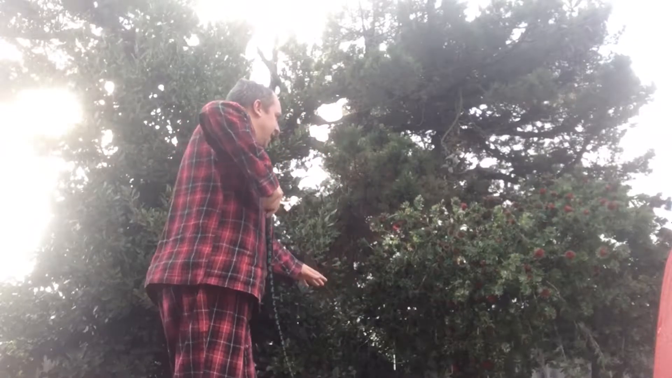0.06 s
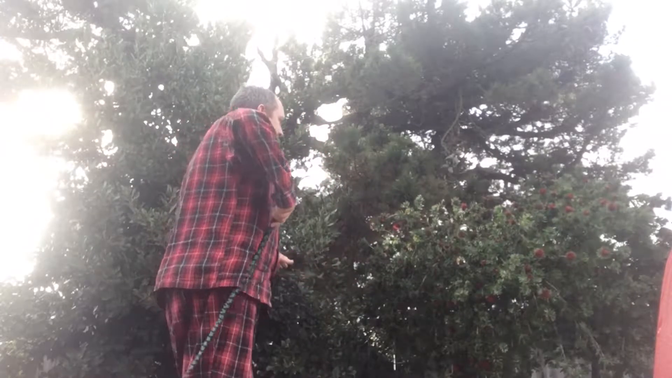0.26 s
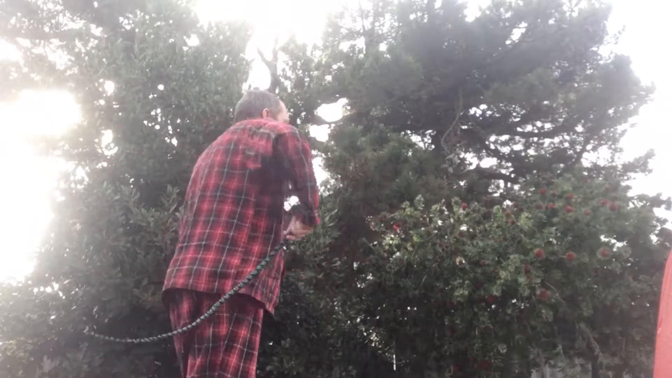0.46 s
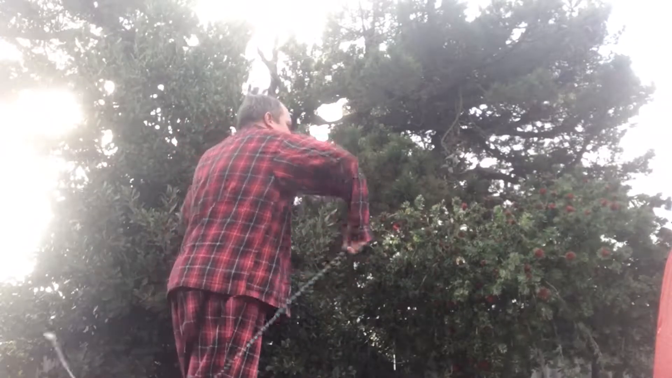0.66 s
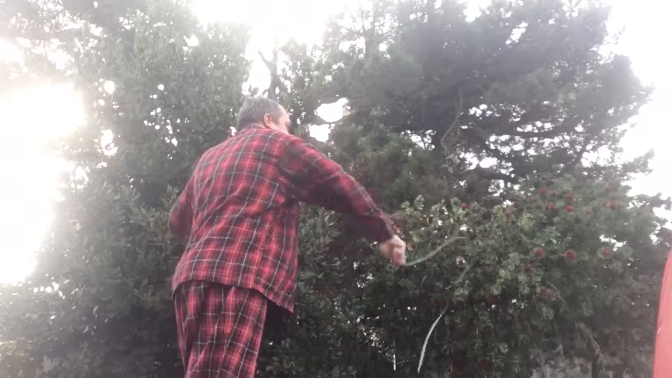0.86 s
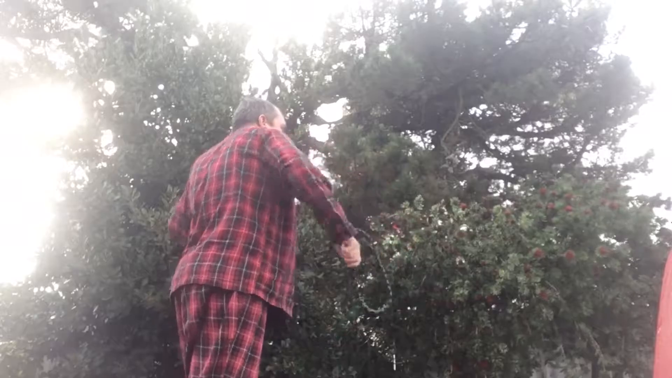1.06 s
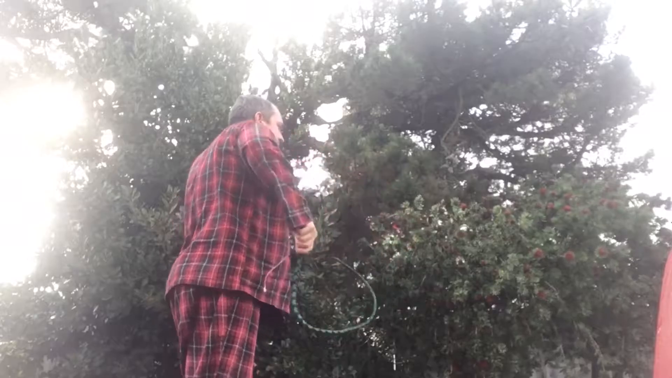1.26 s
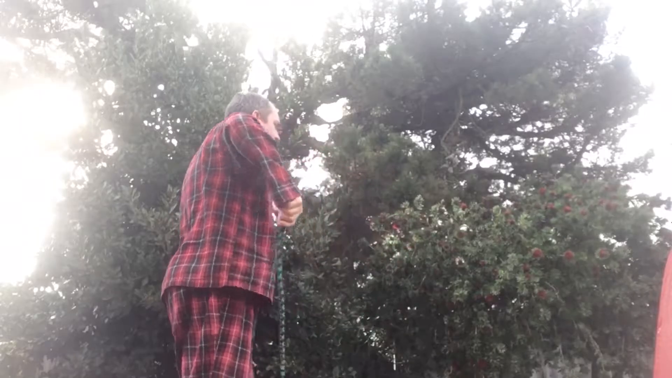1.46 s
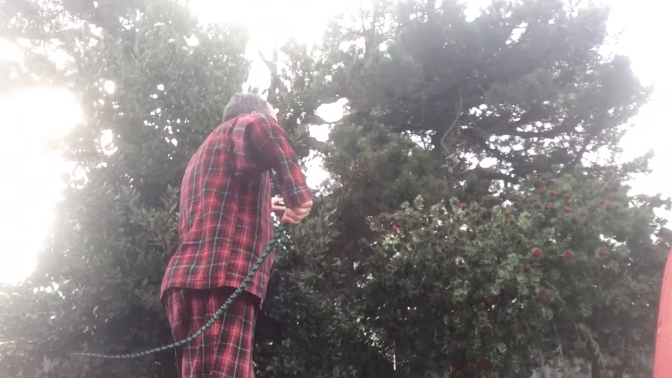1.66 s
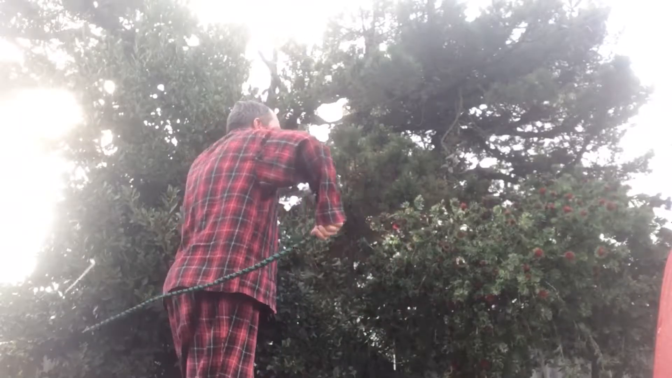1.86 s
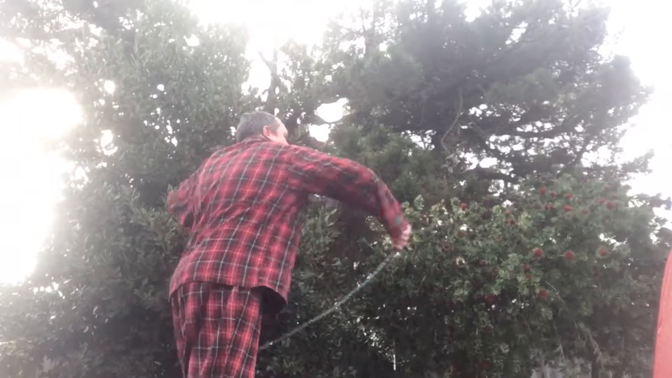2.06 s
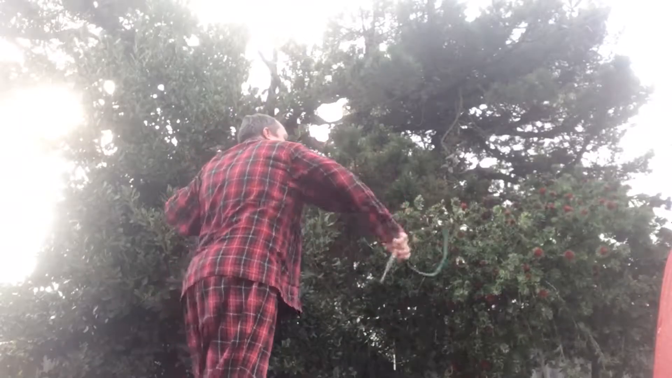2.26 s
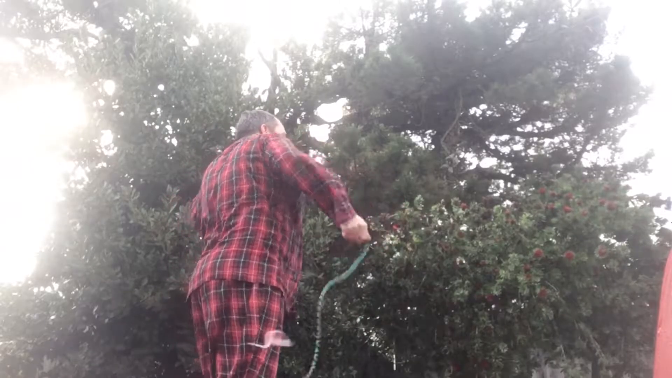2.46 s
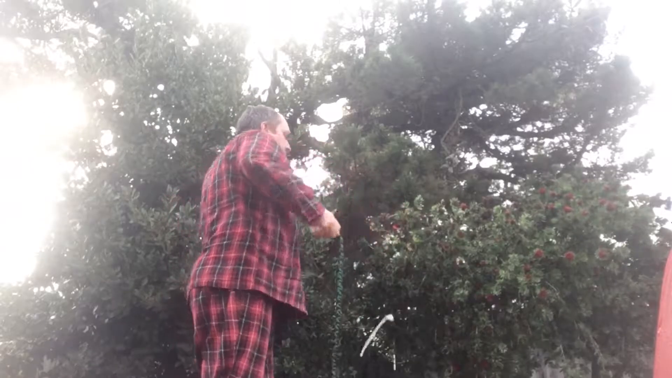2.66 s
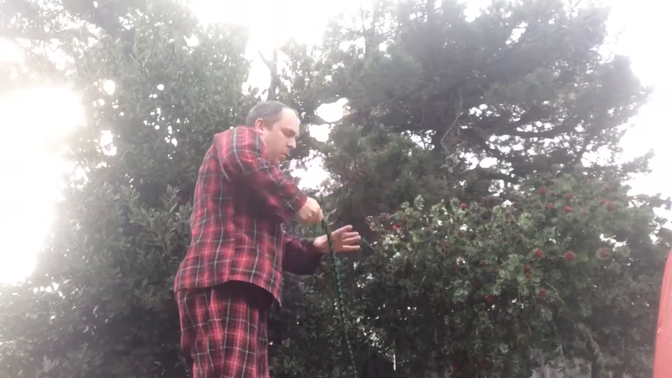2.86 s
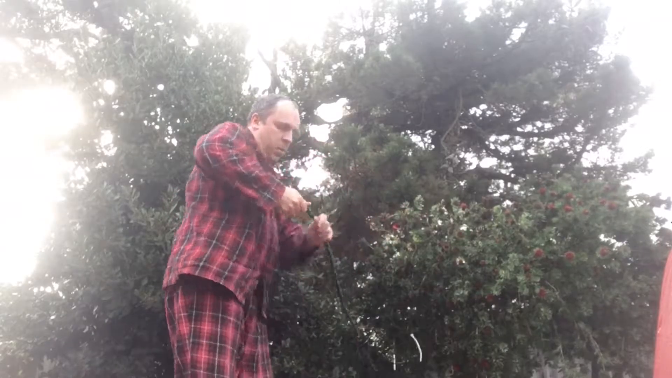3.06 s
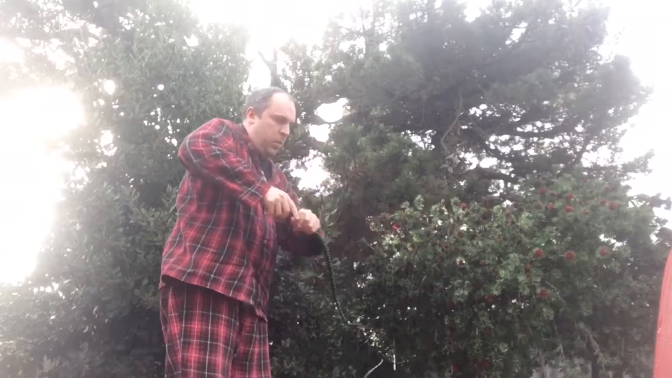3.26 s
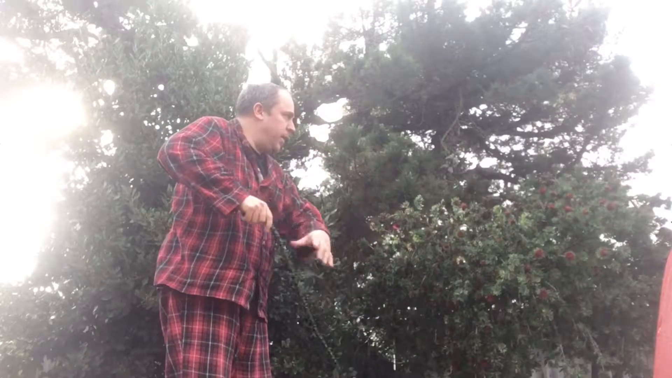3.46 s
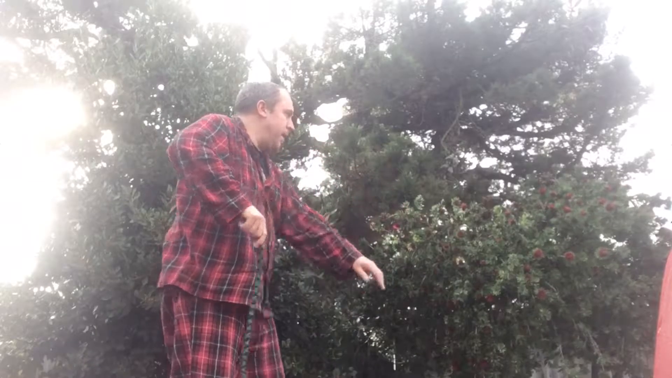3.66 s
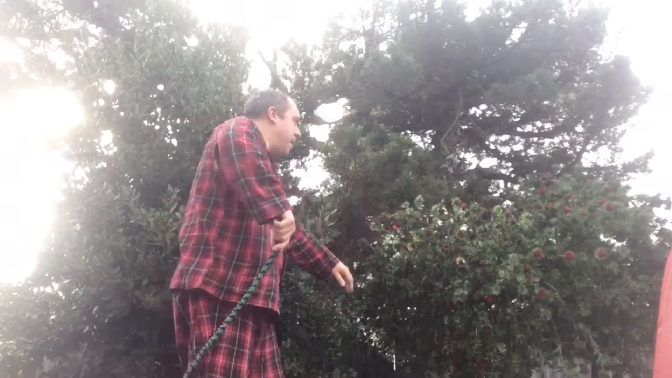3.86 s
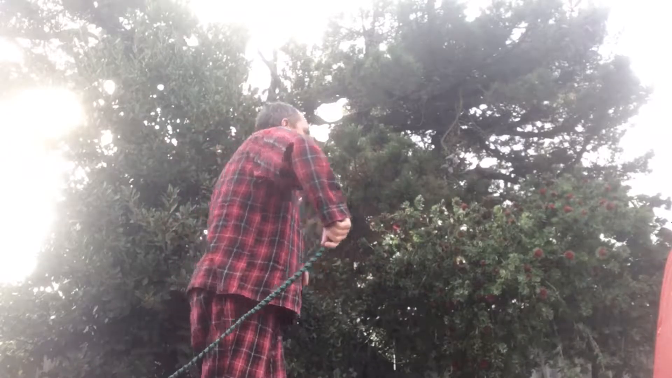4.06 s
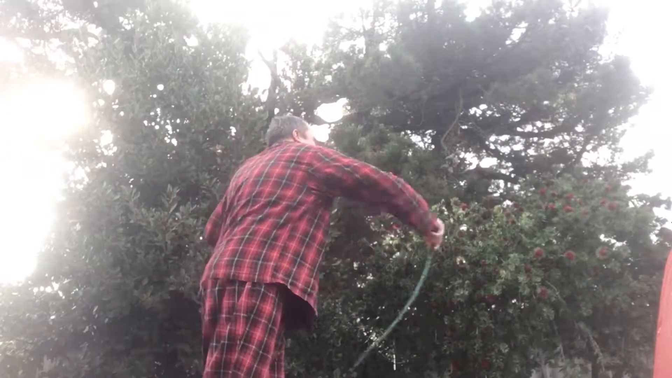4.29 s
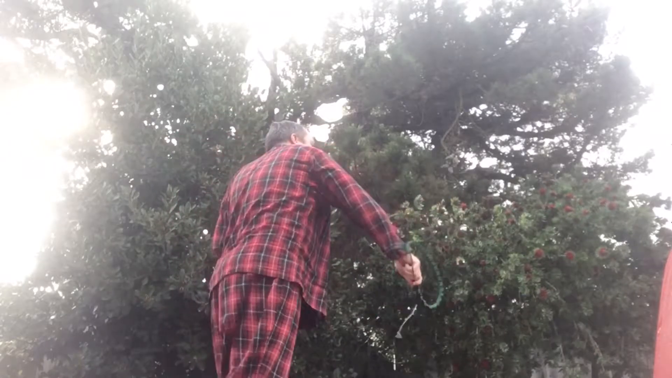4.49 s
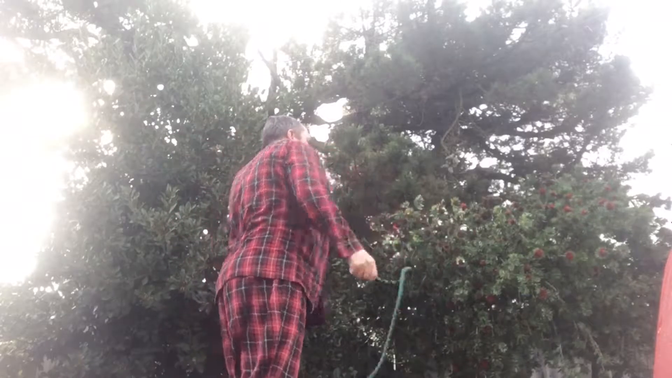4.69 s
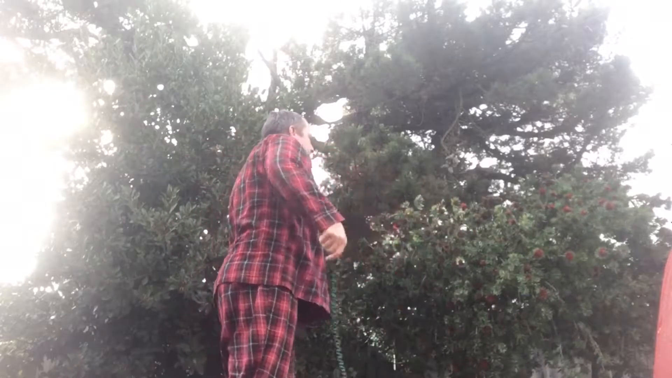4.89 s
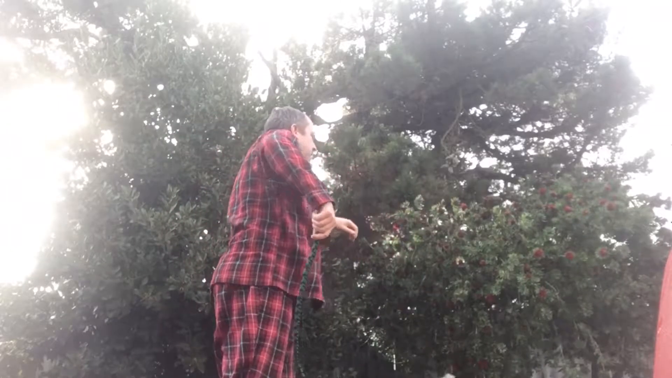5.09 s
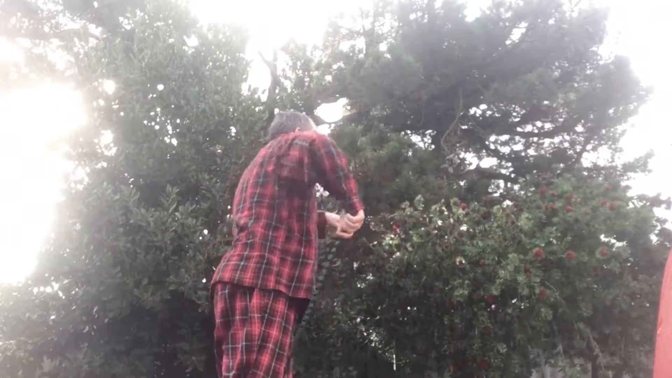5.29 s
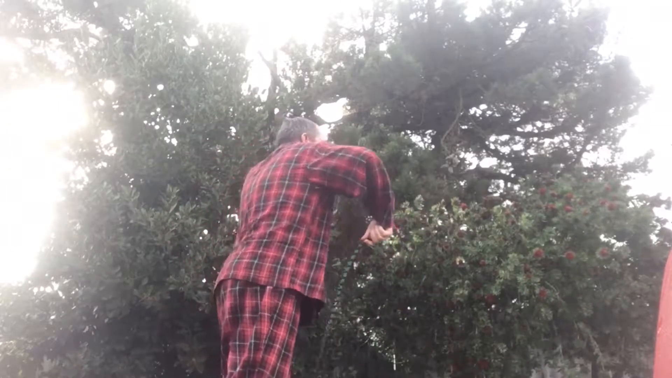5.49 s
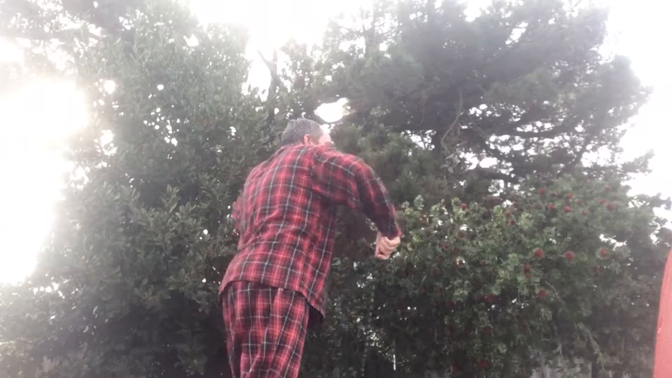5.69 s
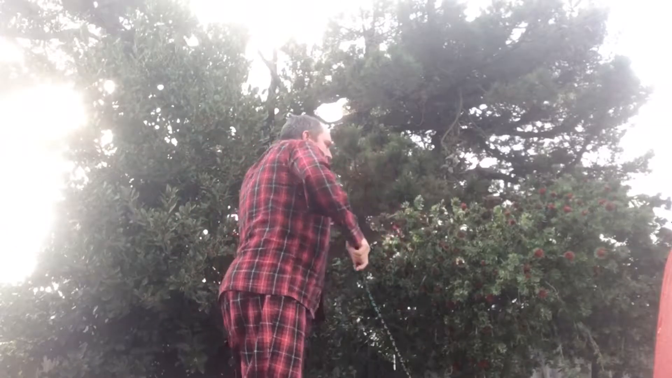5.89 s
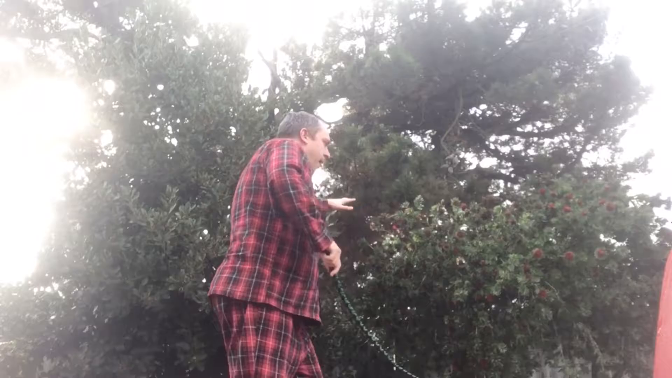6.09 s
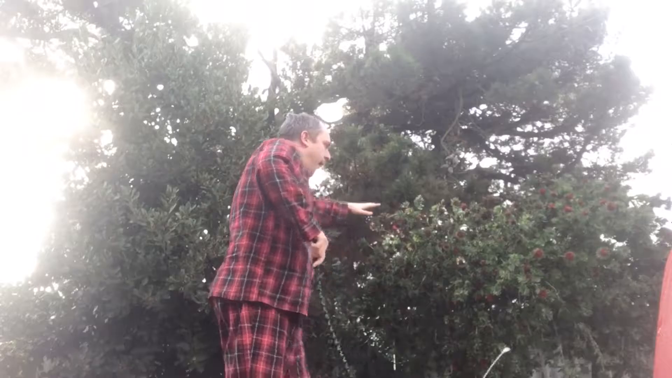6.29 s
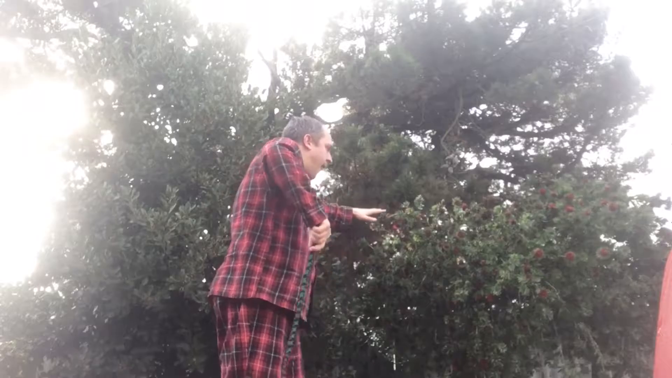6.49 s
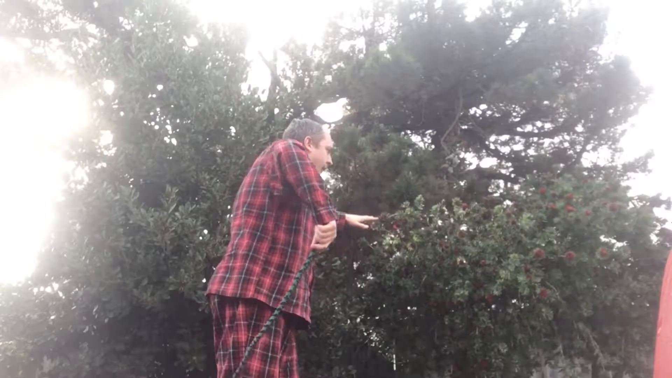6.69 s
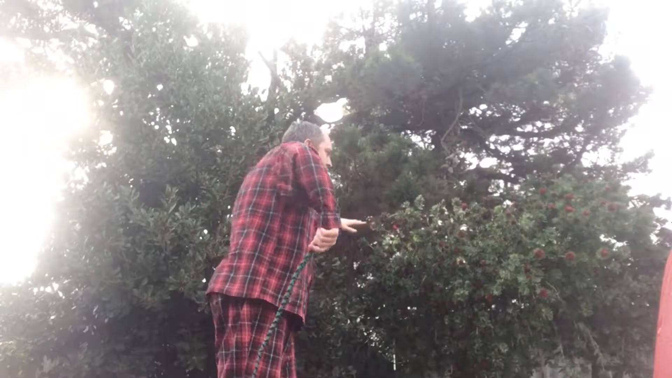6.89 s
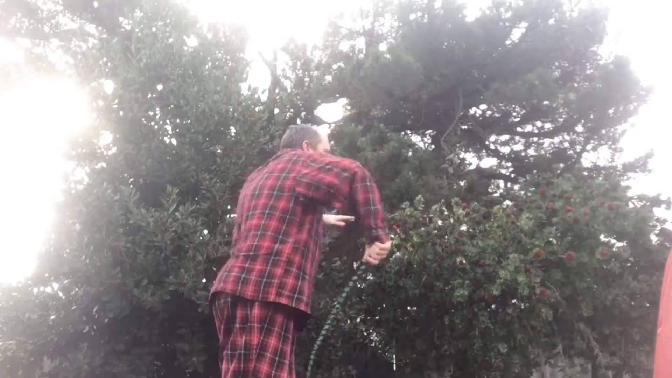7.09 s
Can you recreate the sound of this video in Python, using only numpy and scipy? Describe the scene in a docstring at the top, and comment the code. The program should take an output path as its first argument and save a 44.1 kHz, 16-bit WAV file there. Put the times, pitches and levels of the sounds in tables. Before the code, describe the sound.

Three sharp whip cracks outdoors, each echoing off a wall and trees, over a distant engine drone, with small grass slaps and ticks.

```python
"""Three sharp whip cracks ring out in a garden, each answered by a house wall and the trees around. Each crack
is a pair of shocks in a ragged burst of noise; its echoes are delayed pulses and dense clicks. The lash also
slaps and brushes the grass, in filtered clicks and noise, and ticks in tiny noise bursts. Behind it a distant
engine drones and fades as a wavering-level tone, with a far motor, tyres and a hoot as narrow bands, over
filtered noise for a low-mid background, light wind and hiss."""
import sys
import numpy as np
from scipy import signal
from scipy.fft import rfft, irfft
from scipy.io import wavfile
from scipy.ndimage import uniform_filter1d

SR = 44100
rng = np.random.default_rng(int(sys.argv[2]) if len(sys.argv) > 2 else 0)


def to_wav(s):
    """Save 16-bit WAV."""
    ch = np.atleast_2d(s).T  # columns
    pcm = np.round(np.clip(ch, -1, 1) * 32767)  # PCM
    wavfile.write(sys.argv[1], SR, pcm.astype(np.int16))


N = 314874
T = np.arange(N) / SR   # time of every sample, in seconds


def from_db(db):
    """Turn decibels into a gain."""
    return 10 ** (np.asarray(db) / 20)


def rms_one(x):
    """Scale to an rms (average strength) of 1."""
    return x / np.sqrt(np.mean(x ** 2) + 1e-20)


def level_in_time(points):
    """Read a table of (time, level) at every sample, with straight lines between the points."""
    seconds, level = np.transpose(points)
    return np.interp(T, seconds, level)


def at_hz(points, hz):
    """Read a table of (frequency, value), with straight lines on a log-frequency axis."""
    f, value = np.transpose(points)
    return np.interp(np.log(np.maximum(hz, 1)), np.log(f), value)


def butter(x, hz, kind, order=2):
    """Butterworth filter that only looks back in time."""
    edges = np.clip(hz, 10, .45 * SR)
    sos = signal.butter(order, edges, kind, fs=SR, output="sos")
    return signal.sosfilt(sos, x + 1e-18)


def drift(rate, size=N):
    """A random wandering with a new goal `rate` times a second; its spread is about 1."""
    knots = rng.standard_normal(int(size * rate / SR) + 2)
    position = np.arange(size) * rate / SR
    return np.interp(position, np.arange(len(knots)), knots) * np.sqrt(3 / 2)


def glide(start_value, end_value, middle, ease):
    """A smooth step from one value to another."""
    progress = (1 + np.tanh((T - middle) / (2 * ease))) / 2
    return start_value + (end_value - start_value) * progress


def swell(t, rise, decay):
    """Exponential rise to 1 at t = 0, then exponential fall."""
    return np.exp(np.where(t < 0, t / abs(rise), -t / abs(decay)))


def window(start):
    """The samples around an event, and their time from it."""
    span = slice(max(int(start * SR) - SR // 10, 0), int(start * SR) + SR)
    return span, T[span] - start


def colour(x, spectrum, tilt_db=0, size=8192):
    """Shape the spectrum without ringing ahead (minimum phase), at unit power gain; tilt is per decade."""
    hz = np.maximum(np.fft.rfftfreq(size, 1 / SR), 1)
    gain = rms_one(from_db(at_hz(spectrum, hz) + tilt_db * np.log10(hz)))
    # folding the cepstrum onto positive times gives the minimum-phase filter
    cepstrum = irfft(np.log(gain + 1e-6))
    cepstrum[1:size // 2] *= 2
    cepstrum[size // 2 + 1:] = 0
    impulse = irfft(np.exp(rfft(cepstrum)))
    return signal.fftconvolve(x, impulse)[:len(x)]


def grains(size, rough_db):
    """A dense stream of tiny arrivals of uneven strength; rms 1."""
    return rms_one(rng.standard_normal(size) * from_db(rough_db * drift(2500, size)))


def facets(size, per_s):
    """Many small surfaces each give a click of their own, of random strength and sign; rms 1."""
    happens = rng.random(size) < per_s / SR
    return rms_one(happens * rng.standard_normal(size))


def narrow_band(hz, width_hz, steady):
    """A tone whose strength and phase wander around a steady part; rms 1."""
    carrier = np.exp(2j * np.pi * np.cumsum(hz) / SR)
    wander = steady + drift(width_hz) + 1j * drift(width_hz)
    return rms_one(np.real(carrier * wander))


def hiss(sound, threshold_db=-40, hold=0.322, open_db=8):
    """A noise suppressor holds the hiss down, and lets it up for a moment after loud treble."""
    # colour of the hiss: (f/Hz, level per Hz/dB)
    hiss_spectrum = [(2350, -23.5), (4000, -4), (4960, -4.5), (9660, -2.5), (10400, -8), (11800, -4),
                     (15100, -10), (16000, -15)]
    treble_power = uniform_filter1d(butter(sound, 5000, "high") ** 2, SR // 200)
    loud = treble_power > from_db(threshold_db) ** 2
    last_loud = np.maximum.accumulate(np.where(loud, T, -10))
    opened = butter(1. * (T - last_loud < hold), 15, "low", order=1)
    held_down_db = -74.5
    gain = from_db(held_down_db + open_db * opened + 0.66 * drift(25))
    return gain * colour(grains(N, rough_db=1.0), hiss_spectrum)


def wind():
    """Light wind is low noise whose strength is lumpy."""
    # colour of the wind: (f/Hz, level per Hz/dB)
    wind_spectrum = [(12, -60), (20, -25), (55, -1), (76, 0), (106, -3), (166, -9.5), (264, -14.5),
                     (311, -20), (340, -27), (400, -28), (520, -56.5), (880, -120)]
    # strength of the wind, with one lull, before the lumps: (t/s, level/dB)
    wind_level = [(0, -45), (5.6, -46.5), (6.25, -50.5), (6.6, -48.5), (7.14, -47.5)]
    lumpy_db = level_in_time(wind_level) + 1.8 * drift(14)
    return from_db(lumpy_db) * colour(rng.standard_normal(N), wind_spectrum)


def low_mid_background():
    """A smooth low-mid background noise, which swells for a while after the first two cracks."""
    # colour of the low-mid background: (f/Hz, level per Hz/dB)
    background_spectrum = [(180, -28.5), (300, -6.5), (384, -5), (437, -6), (652, -6), (855, -6.5),
                           (1030, -6.5), (1160, -8), (1650, -14), (5000, -34), (6500, -63), (11000, -120)]
    # loudness of the low-mid background, before the trim below: (t/s, level/dB)
    background_level = [(0.0, -56), (0.71, -57.5), (1.09, -55.5), (2.03, -58), (2.5, -54), (2.62, -55.5),
                        (5.77, -60), (7.14, -60.5)]
    trim_db = -0.2
    gain = from_db(level_in_time(background_level) + trim_db)
    return gain * colour(rng.standard_normal(N), background_spectrum)


def tyres():
    """Tyres sing in a wavering band, loudest as the car passes; the pitch falls as it leaves."""
    pass_at_s, pass_s, peak_db = .8, 1.1, -60.5
    hz = glide(854, 740, middle=1.7, ease=.1)
    nearness = 1 / (1 + ((T - pass_at_s) / pass_s) ** 2)
    return from_db(peak_db) * nearness * narrow_band(hz, width_hz=150, steady=0)


def motor():
    """A far motor revs up and settles on a top pitch, as a slightly wavering tone."""
    # loudness of the motor: (t/s, level/dB)
    motor_level = [(5.95, -75), (6.12, -59.5), (6.3, -60.5), (6.62, -69), (6.82, -61), (7.14, -69.5)]
    hz = glide(275, 338, middle=6.17, ease=.06)
    return from_db(level_in_time(motor_level)) * narrow_band(hz, width_hz=14, steady=2.5)


def exhaust():
    """From afar an exhaust is almost a pure firing tone; it throbs once the throttle is eased."""
    # loudness of the distant engine, before the trim below: (t/s, level/dB)
    engine_level = [(0.0, -54), (0.08, -43.5), (0.34, -34), (0.67, -42), (0.92, -30.5), (2.0, -22.5),
                    (2.09, -26), (2.57, -28), (2.76, -42.5), (3.42, -52.5), (3.65, -39), (5.6, -50.5)]
    trim_db, fade_db_per_s = -1, 32
    ease_at_s, ease_s = 2.58, .11
    run_down_at_s, run_down_hz_per_s = 5.1, 9.9
    # the firing rate holds, drops as the throttle is eased, and later runs down
    hz = glide(83.25, 75.0, ease_at_s, ease_s)
    hz = hz - run_down_hz_per_s * np.maximum(T - run_down_at_s, 0)
    phase = 2 * np.pi * np.cumsum(hz) / SR
    # the throb comes once in four firings
    throb = 1 + glide(0, .35, ease_at_s, ease_s) * np.sin(phase / 4)
    tone = np.sin(phase) + from_db(-32) * np.sin(2 * phase)
    # it dies away after the last point of the table
    fade_db = fade_db_per_s * np.maximum(T - engine_level[-1][0], 0)
    db = level_in_time(engine_level) + trim_db - fade_db
    return from_db(db) * rms_one(throb * tone)


def hoot():
    """A short hoarse note far away: a wavering tone that swells and dies."""
    start_s, swell_s, pitch_hz, db = 1.54, 0.024, 685, -47
    note = narrow_band(np.full(N, pitch_hz), width_hz=130, steady=0.46)
    return from_db(db) * swell(T - start_s, swell_s, swell_s) * note


def rustle(db, spread_db=7.5):
    """Sleeves and rope brush faintly in uneven spurts of tiny clicks."""
    spurts = from_db(spread_db * (drift(4.8) + drift(90)) / np.sqrt(2))
    brushing = butter(facets(N, per_s=2500), [3000, 14000], "band")
    return from_db(db) * rms_one(spurts * brushing)


def stalks(t, rise, decay):
    """The lash hits many grass stalks, which then settle."""
    hits = facets(len(t), per_s=4400) * swell(t, rise, decay)
    settling = grains(len(t), rough_db=3) * swell(t, rise, 0.067)
    return hits + from_db(-16.5) * settling


def grass():
    """A slap starts with a click and crackles among the stalks; a brush swells softly."""
    # colour of the grass: (f/Hz, level per Hz/dB)
    grass_spectrum = [(160, -25.5), (280, -3), (1680, -8.5), (2360, -15.5), (2800, -10), (3930, -19),
                      (12400, -21), (16000, -32)]
    # the lash slaps the grass: (t/s, level/dB, decay/s, treble tilt/dB per decade)
    slaps = [(3.893, -44, 0.0027, -2.5), (3.928, -49.5, 0.0064, 5.5), (4.4292, -42, 0.0043, -11),
             (5.7504, -45.5, 0.0024, 5), (5.904, -40, 0.016, 6), (6.3256, -35.5, 0.01, -4.5)]
    # the lash is drawn through the grass: (t/s, level/dB, decay/s)
    brushes = [(5.750, -51, 0.0092), (5.941, -48.5, 0.024), (6.187, -50, 0.013)]
    out = np.zeros(N)
    for start, db, decay, tilt_db in slaps:
        span, t = window(start)
        # the first contact is a click of one sample
        contact = from_db(12.5) * np.diff(1. * (t > 0), prepend=0)
        slap = contact + stalks(t, rise=0.00019, decay=decay)
        out[span] += from_db(db) * colour(slap, grass_spectrum, tilt_db)
    for start, db, decay in brushes:
        span, t = window(start)
        brush = stalks(t, rise=0.014, decay=decay)
        out[span] += from_db(db) * colour(brush, grass_spectrum, tilt_db=7)
    return out


def faint_ticks(count=16):
    """Fainter ticks at random moments while the whip is handled, as rows like those of the clear ticks."""
    handling_from_s, per_s = 2.2, 1.0
    middle_db, centre_hz, decay_s = -59, 8550, 0.0026
    chance = rng.random((count, 2))
    starts = handling_from_s + np.cumsum(.5 + chance[:, 0]) / per_s
    levels = middle_db + 8 * (chance[:, 1] - .5)
    return [(s, db, centre_hz, decay_s) for s, db in zip(starts, levels) if s < T[-1]]


def ticks():
    """Handle and lash tick in tiny bursts of one broad band, each with a weak longer tail."""
    # the clearer ticks of handle and lash: (t/s, level/dB, centre f/Hz, decay/s)
    clear_ticks = [(0.107, -63, 9050, 0.038), (1.534, -60, 9300, 0.015), (2.578, -36, 1070, 0.002),
                   (2.642, -46.5, 10000, 0.0012), (2.6599, -37, 7140, 0.00042), (2.907, -51, 9100, 0.0013),
                   (3.432, -53.5, 2500, 0.0028), (4.881, -51, 7830, 0.0021), (5.859, -55, 9100, 0.0008)]
    out = np.zeros(N)
    noise = rng.standard_normal(N)
    for start, db, hz, decay in [*clear_ticks, *faint_ticks()]:
        span, t = window(start)
        snap = rms_one(butter(noise[span], [hz / 1.55, hz * 1.2], "band"))
        shape = swell(t, .0002, decay) + from_db(-18.5) * swell(t, .0002, .03)
        out[span] += from_db(db) * snap * shape
    return out


def n_wave(t, length):
    """The pressure of one shock: a jump up, a straight fall, a jump back."""
    return np.where(abs(t) < length / 2, -2 * t / length, 0)


def leading_shock(t, length=0.00056):
    """The shock and its close reflection; their spacing gives the crack a hollow middle."""
    gap_s = .0012
    return n_wave(t, length) + 0.88 * n_wave(t - gap_s, length)


def thud(t, hz, decay=0.0075):
    """The pushed air arrives as a few slow swings of pressure that soon die."""
    age = np.maximum(t, 0)
    return np.sin(2 * np.pi * hz * age) * np.exp(-age / decay)


def wall_echo(t):
    """A flat wall returns the shock whole, dulled on the way."""
    dulled = butter(n_wave(t, length=.0005), 7000, "low", order=1)
    return butter(dulled, 550, "high", order=1)


def garden_tail(t, tilt_db):
    """Foliage returns the shock from all sides as dense clicks; each band dies at its own pace."""
    # colour of the sound scattered by the garden: (f/Hz, level per Hz/dB)
    scatter = [(59, -29), (100, -2), (145, -5), (513, -15), (854, -19.5), (1200, -18), (1610, -18.5),
               (2080, -20.5), (2690, -12.5), (4200, -18.5), (6990, -18.5), (11600, -23), (16000, -33.5)]
    # how long the scattered sound takes to fall by 60 dB: (f/Hz, fall time/s)
    scatter_t60 = [(150, 0.23), (500, 0.36), (1500, .42), (3000, 0.3), (6000, .32), (10000, .28),
                   (16000, 0.15)]
    noise = colour(facets(len(t), per_s=14000), scatter, tilt_db)
    noise = noise * from_db(1.7 * drift(250, len(t)))
    age, fading = np.maximum(t, 0), 0
    # peel off one band after another, from the bass up
    for hz in 90 * 2 ** np.arange(0, 7.6, .75):
        low = signal.sosfiltfilt(signal.butter(3, hz, fs=SR, output="sos"), noise)
        fading = fading + low * from_db(-60 * age / at_hz(scatter_t60, hz / np.sqrt(2)))
        noise = noise - low
    near = from_db(-10.0) * fading * (1 - np.exp(-age / .003))
    # far trees answer later, in the middle band only, and more strongly to a dull crack
    far = butter(facets(len(t), per_s=6000), [1150, 3300], "band")
    far = rms_one(butter(far, 5000, "low")) * (1 - np.exp(-(age / 0.063) ** 2))
    far = far * from_db(-60 * age / 0.77)
    return near + from_db(-25.0 - 0.52 * tilt_db) * far


def ragged(x, share=0.4, decay=0.0092, size=512):
    """Every echo repeats the same ragged burst, so all share its ripple in the treble."""
    trail = rng.standard_normal(size) * np.exp(-np.arange(size) / SR / decay)
    trail = butter(trail, 990, "high")
    trail *= share / np.sqrt(np.sum(trail ** 2))
    return (x + np.convolve(x, trail)[:len(x)]) / np.sqrt(1 + share ** 2)


def cracks():
    """The tip goes supersonic: a hiss of the lash, a leading shock in a ragged burst, then the echoes."""
    # whip cracks: (t/s, level/dB, treble tilt/dB per decade, rise/s, leading shock/dB, thud f/Hz,
    # thud level/dB, wall echo before the echo boost/dB, tail tilt/dB per decade)
    crack_rows = [(0.9921, -12.5, -2, 0.002, -6, 188, -10.5, 8.5, -3),
                  (2.3157, -9.5, 2, 0.0012, 2.5, 188, -5, 0.5, 4),
                  (4.5282, -15.5, 0, 0.0024, 3, 108.4, -2, 3.5, -0.5)]
    # time the house wall takes to return each crack: one delay/s for each crack
    wall_delays = [.0303, .0290, .0293]
    # colour of the shock as it reaches the microphone: (f/Hz, level per Hz/dB)
    shock_spectrum = [(35, -34.5), (60, -8.5), (217, 5.5), (458, -8.5), (903, -7.5), (1140, -13.5),
                      (1580, -5.5), (2190, -12.5), (2580, -7.5), (2900, -10.5), (4750, -13.5), (6740, -4.5),
                      (10800, -13), (12100, -6.5), (16000, -21)]
    # echoes from fence, hedge and trees: (delay/s, level before the boosts/dB, spread/s, top f/Hz)
    echo_rows = [(0.023, -15, 0.0048, 10030), (.0400, -10.5, 0.003, 4033), (.0895, -13, .0075, 3700),
                 (0.115, -19.5, 0.007, 3680), (0.207, -33, .02, 3000)]
    out = np.zeros(N)
    for row, wall_delay in zip(crack_rows, wall_delays):
        start, db, tilt_db, rise, lead_db, thud_hz, thud_db, wall_db, tail_tilt_db = row
        span, t = window(start)
        # the burst swells and dies, with its strongest part held at one limit
        body = np.minimum(from_db(3.5) * swell(t - .0007, rise, .0036), from_db(4))
        burst = butter(grains(len(t), rough_db=1.5) * body, 350, "high", order=1)
        shock = burst + from_db(lead_db) * leading_shock(t + .0006)
        shock = colour(shock, shock_spectrum, tilt_db)
        # the hiss of the lash builds up just before the shock
        swish = butter(grains(len(t), rough_db=-1.5), [1500, 11000], "band", order=1)
        swish = from_db(-33) * swell(t, 0.013, .002) * swish
        echoes = from_db(wall_db) * wall_echo(t - wall_delay) + garden_tail(t, tail_tilt_db)
        for delay, echo_db, spread, top_hz in echo_rows:
            cluster = facets(len(t), per_s=9000) * swell(t - delay, spread / 2, spread)
            cluster = butter(colour(cluster, shock_spectrum), top_hz, "low", order=4)
            echoes += from_db(echo_db + 6) * butter(cluster, 1600, "high")
        echoes = from_db(1.5) * ragged(echoes)   # the echo boost
        push = from_db(thud_db) * thud(t + 0.00081, thud_hz)
        out[span] += from_db(db) * (shock + swish + echoes + push)
    return out


def scene():
    """Everything at one microphone."""
    background = wind() + low_mid_background() + tyres() + motor() + exhaust() + hoot()
    whip = rustle(db=-80.5) + grass() + ticks() + cracks()
    sound = background + whip
    return (sound + hiss(sound))[None]


def record(dry):
    """The highest peaks are rounded and the top is cut."""
    rounded = 1.2 * np.tanh(dry / 1.2)
    cutoff_hz = 16000
    top_cut = signal.ellip(10, .2, 80, cutoff_hz, fs=SR, output="sos")
    return signal.sosfilt(top_cut, rounded)


dry = scene()
out = record(dry)
to_wav(out)
```